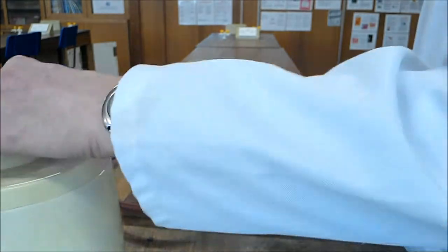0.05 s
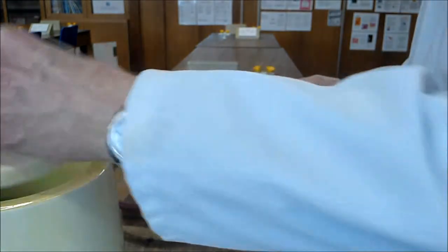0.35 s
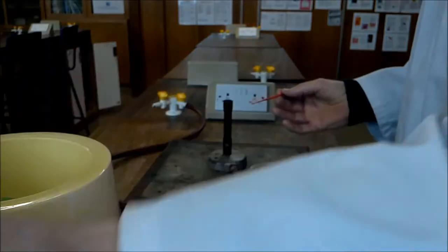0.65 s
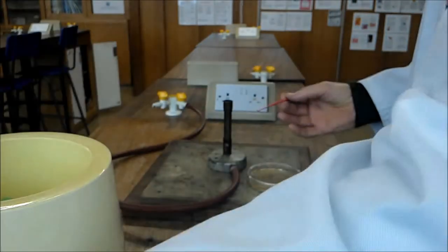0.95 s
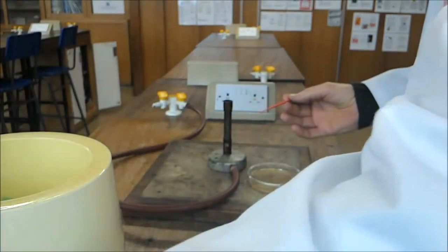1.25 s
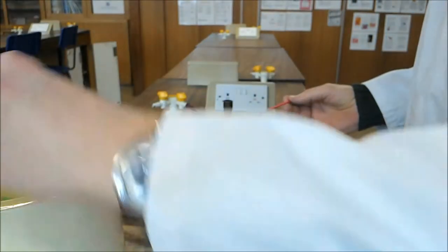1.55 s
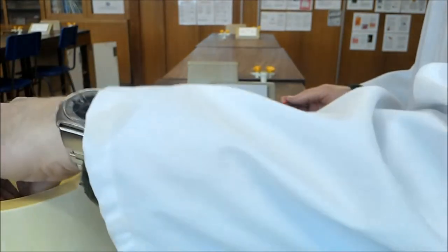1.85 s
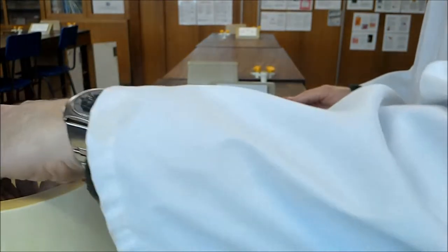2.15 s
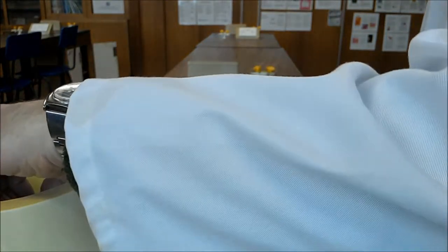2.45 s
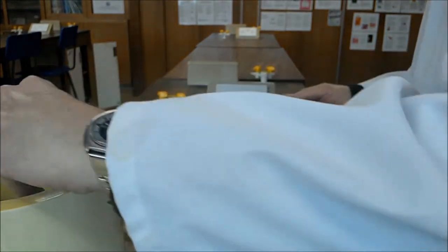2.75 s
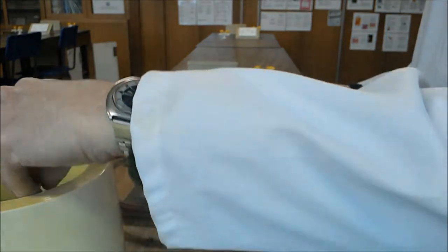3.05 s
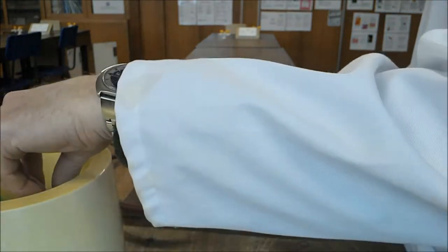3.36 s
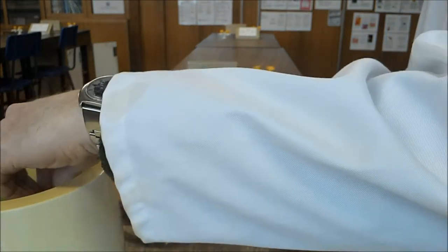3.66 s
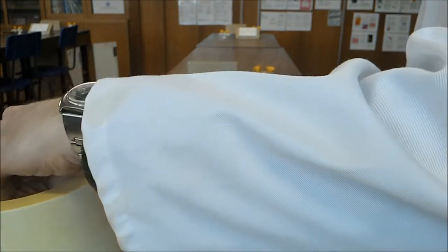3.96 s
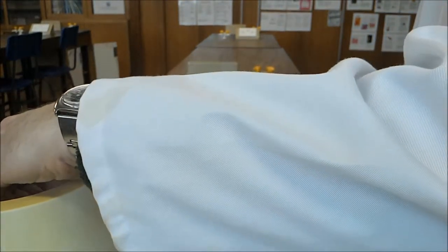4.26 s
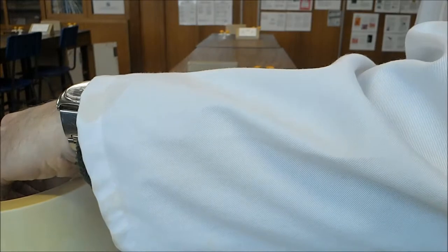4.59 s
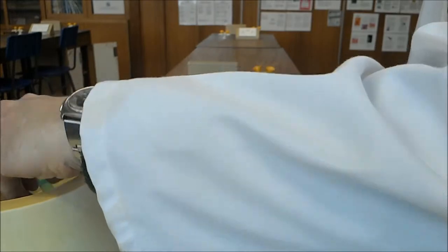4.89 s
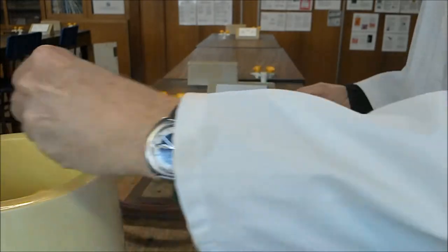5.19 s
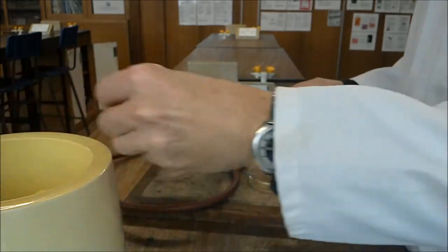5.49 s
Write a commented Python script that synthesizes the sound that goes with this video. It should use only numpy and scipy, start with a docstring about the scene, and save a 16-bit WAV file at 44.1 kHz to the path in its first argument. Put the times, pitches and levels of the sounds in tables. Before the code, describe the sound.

A gas burner hisses faintly while a sleeve rustles close by, with one sharp snap, a hard knock and scattered dry clicks.

```python
"""A gas burner hisses on a laboratory bench, its jet exciting the tube's resonances over a roaring flame.
Early bumps and knocks set the bench and room ringing; at 1.3 s a sharp snap makes the gain control duck
and slowly recover, and the hardest knock follows. An arm reaches across near the microphone and shades
the hiss: fingers rummage in a plastic pot, a cotton sleeve brushes, and creases give way in dry ticks.
From about 5 s the hiss comes out of the arm's shadow and the flame swells."""
import sys
import numpy as np
from scipy import signal
from scipy.fft import rfft, irfft
from scipy.io import wavfile
from scipy.ndimage import uniform_filter1d

SR = 44100
rng = np.random.default_rng(int(sys.argv[2]) if len(sys.argv) > 2 else 0)


def log_audio(samples):
    """Write samples as a 16-bit WAV file to the path given in sys.argv[1]."""
    # one column per channel
    frames = np.atleast_2d(samples).T
    # limit to full scale, then quantise
    limited = np.clip(frames, -1, 1)
    pcm = np.round(limited * 32767).astype(np.int16)
    wavfile.write(sys.argv[1], SR, pcm)


N = 252693
TIME = np.arange(N) / SR


def undb(db):
    """Amplitude ratio of a level in decibels."""
    return 10 ** (np.asarray(db) / 20)


def unit(x):
    """Normalisation to rms 1."""
    return x / np.sqrt(np.mean(x ** 2))


def add(track, s, sound):
    """Superposition: a sound joins the track at time s."""
    start = int(s * SR)
    track[start:start + len(sound)] += sound[:N - start]


def colour(x, points):
    """Spectral shaping by a curve of (frequency [Hz], gain [dB]) points."""
    hz, db = np.transpose(points)
    bins = np.fft.rfftfreq(len(x), 1 / SR)
    gain_db = np.interp(np.log(bins + 1), np.log(hz), db)
    return irfft(rfft(x) * undb(gain_db), len(x))


def band(x, hz, width):
    """Second-order resonance with gain 1 at its centre."""
    return signal.lfilter(*signal.iirpeak(min(hz, SR / 2 - 1), hz / width, fs=SR), x)


def wander(rate):
    """Smooth random modulation of rms 1."""
    hold = int(SR / rate)
    steps = np.repeat(rng.standard_normal(N // hold + 1), hold)
    return unit(uniform_filter1d(uniform_filter1d(steps, hold), hold)[:N])


def fade(t60, size):
    """Exponential decay by 60 dB in t60 seconds."""
    return np.exp(-np.log(1000) * TIME[:size] / t60)


def ring(modes, size):
    """Free vibration of damped modes (frequency [Hz], level [dB], t60 [s])."""
    return sum(undb(db) * np.sin(2 * np.pi * hz * TIME[:size]) * fade(t60, size) for hz, db, t60 in modes)


def crackle(spectrum, t60, grit_db, rise_s=0.00021, size=4096):
    """Tiny slips superpose in a decaying burst with the energy of 5 ms at rms 1."""
    slips = rng.standard_normal(size) * undb(grit_db * rng.standard_normal(size))
    onset = 1 - np.exp(-(TIME[:size] / rise_s) ** 2)
    burst = colour(slips, spectrum) * fade(t60, size) * onset
    return burst * np.sqrt(SR / 200 / np.sum(burst ** 2))


# rush of gas and air: (frequency [Hz], relative level [dB])
JET_SPECTRUM = [(200, 9), (600, -4), (1300, 2), (3000, 2.5), (4800, 4.5), (6300, 5.5), (7600, 0),
                (11000, -6), (15500, -15.5)]
# resonances of the burner tube: (frequency [Hz], bandwidth [Hz], lift [dB])
TUBE_RESONANCES = [(1987, 42, 19), (3900, 120, 12), (5700, 180, 7), (8500, 240, 7.5), (10150, 300, 3),
                   (11750, 300, 5), (14300, 400, 6)]
def jet_hiss(waver_db=1.5):
    """Forced resonance: broadband jet noise drives the tube, whose response wavers."""
    jet = colour(rng.standard_normal(N), JET_SPECTRUM)
    whistle = sum((undb(db) - 1) * band(jet, hz, width) for hz, width, db in TUBE_RESONANCES)
    return unit(jet + whistle * undb(waver_db * wander(9)))


# roar of the flame: (frequency [Hz], relative level [dB])
FLAME_SPECTRUM = [(20, -56), (60, -20), (125, -4), (220, -0.6), (330, -6), (480, -14), (800, -22.5),
                  (2000, -48)]
# course of the burner: (time [s], treble gain past the arm [dB], flame gain [dB])
BURNER_COURSE = [(0, -15, -6.5), (.62, -10, -3.5), (.85, -1, -1.2), (1.3, -1, 1), (1.851, -7.5, -1),
                 (2.8, -7.5, 1), (3.35, -9, -3.5), (4.6, -9, -.5), (5.0, -3.5, 1), (5.3, 0, 5.5),
                 (5.73, 3, 6)]
def burner(hiss_db=-52.5, roar_db=-51.5, flutter_db=1.6):
    """Combustion noise: the flame's low, fluttering roar lies under the shaded hiss of the jet."""
    times, *columns = np.transpose(BURNER_COURSE)
    shade_db, flame_db = (np.interp(TIME, times, column) for column in columns)
    hiss = arm_shadow(jet_hiss(), shade_db)
    roar = unit(colour(rng.standard_normal(N), FLAME_SPECTRUM))
    return hiss * undb(hiss_db) + roar * undb(roar_db + flame_db + flutter_db * wander(20))


def arm_shadow(x, db, low_share=0.47, middle_share=.7):
    """Diffraction: long waves bend round the arm, so only the top band takes the full level change."""
    low = colour(x, [(2200, 0), (3500, -10), (7000, -40)])
    top = colour(x, [(3500, -40), (7000, -8), (9000, 0)])
    middle = x - low - top
    return low * undb(low_share * db) + middle * undb(middle_share * db) + top * undb(db)


# hollow clatter of things on the bench: (frequency [Hz], relative level [dB])
CLATTER_SPECTRUM = [(60, -30), (150, 2), (300, 6.5), (520, -3), (820, -11.5), (1200, -9), (2500, -26),
                    (8000, -62)]
def thump(hz, clatter_db, cycles=5, clatter_t60=0.11):
    """Heavy damping: a struck mode dies in a few cycles, beside the clatter shaken loose."""
    clatter = crackle(CLATTER_SPECTRUM, clatter_t60, grit_db=1.0)
    return ring([(hz, 0, cycles / hz)], size=4096) + undb(clatter_db) * clatter


# soft bumps of hand and arm: (time [s], level [dB], pitch [Hz])
SOFT_BUMPS = [(.088, -32.5, 141), (.377, -36, 220), (3.021, -24.5, 129), (4.169, -28, 253),
              (4.193, -28, 144.8), (4.7662, -33.5, 550), (5.501, -19, 260), (5.5189, -22.5, 138)]
# hard knocks: (time [s], thump level [dB], thump pitch [Hz], click level [dB], click centre [Hz])
HARD_KNOCKS = [(0.1045, -20.5, 396, -34.5, 3600), (0.3554, -35.5, 220, -54.5, 1460),
               (0.6614, -36.5, 500, -44, 2830), (1.0844, -24.5, 300, -28, 4480),
               (1.477, -27.5, 400, -29, 4200), (1.4828, -6.5, 490, -6.5, 2756)]
def knocks(rattle_db=-12, lowest_hz=105):
    """Impact excitation: every blow thumps the bench; a hard contact adds a click and a fine rattle."""
    out = np.zeros(N)
    for s, db, hz in SOFT_BUMPS:
        add(out, s, undb(db) * thump(hz, clatter_db=-19))
    for s, db, hz, click_db, click_hz in HARD_KNOCKS:
        add(out, s, undb(db) * thump(hz, clatter_db=-9))
        spectrum = [(click_hz / 10, -3), (click_hz, 0), (click_hz * 2, -8), (click_hz * 4, -32)]
        add(out, s, undb(click_db) * crackle(spectrum, t60=0.017, grit_db=5.0))
        add(out, s, undb(click_db + rattle_db) * crackle(spectrum, t60=0.19, grit_db=1.5))
    # the deep bass of the blows is filtered out
    return signal.sosfilt(signal.butter(4, lowest_hz, "high", fs=SR, output="sos"), out)


# the bench top and what stands on it: (frequency [Hz], relative level [dB], t60 [s])
BENCH_MODES = [(242, -14, .2), (393, -9.5, 1.25), (525, 2.5, 0.17), (780, -11, 0.24), (840, 11, 0.13),
               (948, 9, 0.15), (1235, 1, .18), (2400, -11, .15)]
def bench(blows):
    """Modal response: each blow is convolved with the free vibration of the bench."""
    return signal.fftconvolve(blows, ring(BENCH_MODES, size=SR))[:N]


# reverberation of the laboratory: (octave centre [Hz], relative level [dB], t60 [s])
ROOM_BANDS = [(138, -15, 0.17), (265, -4, 0.66), (490, -1.5, 0.31), (890, -13.5, 0.39), (1976, -15.5, 0.18),
              (4000, -15.5, .28), (8250, -34.5, .2)]
def room(x, near_t60=0.032, near_db=3, gap_s=0.0023):
    """Reverberation: early reflections from bench and arm lie over the room's longer diffuse tail."""
    response = np.zeros(SR)
    for hz, db, t60 in ROOM_BANDS:
        octave = [(hz / 2, -30), (hz / np.sqrt(2), 0), (hz * np.sqrt(2), 0), (hz * 2, -30), (hz * 10, -70)]
        noise = colour(rng.standard_normal(SR), octave)
        band_share = np.sqrt(2) * hz / SR
        for decay, level_db in ((t60, db), (near_t60, db + near_db)):
            tail = noise * fade(decay, size=SR)
            response += undb(level_db) * tail * np.sqrt(band_share / np.sum(tail ** 2))
    delayed = np.r_[np.zeros(int(gap_s * SR)), response]
    return signal.fftconvolve(x, delayed)[:N]


# the snap's short ring: (frequency [Hz], level before softening [dB], t60 [s])
SNAP_MODES = [(2210, 19, 0.0033), (850, 0, 0.0032), (422, -8, .014), (4800, 0.5, 0.0029)]
def snap(at_s=1.3275, contact_hz=5500):
    """Impulse response: a hard snap by the microphone, its edge softened by the finite contact time."""
    out = np.zeros(N)
    add(out, at_s, -ring(SNAP_MODES, size=2048))
    return signal.lfilter(*signal.butter(2, contact_hz, fs=SR), out)


def tick(hz, neutral_hz=2710, ring_db=5, ring_q=5.4):
    """Buckling: a soft crease rings low with more body, a stiff one high with more edge."""
    octaves = np.log2(hz / neutral_hz)
    body_db = -10 * octaves
    edge_db = -23 + 9 * octaves
    spectrum = [(150, body_db - 18), (600, body_db - 8), (1200, body_db), (2200, body_db),
                (4300, 0), (6200, -3), (8500, edge_db), (15000, edge_db - 14)]
    burst = crackle(spectrum, t60=0.013, grit_db=4)
    return np.std(burst) * unit(burst + undb(ring_db) * band(burst, hz, hz / ring_q))


# sharpest ticks of creases and of fingers in the pot: (time [s], level [dB], ring frequency [Hz])
SHARP_TICKS = [(1.723, -44, 4520), (2.0226, -38.5, 4030), (2.473, -42.5, 4200), (2.5822, -33, 6000),
               (2.6691, -31, 6000), (2.9429, -31.5, 1160), (2.954, -28.5, 3530), (2.9985, -29.5, 1190),
               (3.0608, -17.5, 5030), (3.1807, -33.5, 4200), (3.214, -35, 3070), (3.2526, -35.5, 4340),
               (3.531, -37, 2350), (3.537, -40.5, 1200), (3.5734, -36.5, 5900), (3.6525, -39, 5900),
               (3.6756, -25, 3970), (3.722, -26, 5050), (3.7315, -18.5, 3220), (4.1739, -34, 3326),
               (4.2037, -26, 4630), (4.287, -39, 6300), (4.3315, -25.5, 5170), (4.4216, -29, 1900),
               (4.4787, -40.5, 3200), (4.4984, -39.5, 3000), (4.7661, -32.5, 5600), (4.8173, -31.5, 4530),
               (5.0668, -30.5, 5160), (5.069, -34.5, 1245), (5.1876, -35.5, 4100), (5.36, -41.5, 2600)]
def ticks(settle_s=.02, settle_db=-16.0, slips=2):
    """Relaxation: weaker slips follow each sharp tick as the crease settles."""
    out = np.zeros(N)
    for s, db, hz in SHARP_TICKS:
        add(out, s, undb(db) * tick(hz))
        for lateness in rng.random(slips):
            gain = undb(db + settle_db) * (1 - lateness / 2)
            add(out, s + settle_s * lateness, gain * tick(hz))
    return out


# cotton catching, and cotton sliding freely: (frequency [Hz], relative level [dB])
CATCH_SPECTRUM = [(200, 1.5), (700, 1.5), (1500, 1), (3000, 3.5), (4600, -2), (6300, 5), (8000, -2.5),
                  (12000, -14), (15500, -54)]
SWISH_SPECTRUM = [(800, -21), (3000, -22), (4600, 9), (6400, 11.5), (8000, -7), (11000, -5), (14000, -11),
                  (15500, -19)]
# strokes: (centre time [s], duration [s], catching level [dB], swish level [dB], crease ring [Hz])
SLEEVE_STROKES = [(2.024, .04, -47, -63, 3360), (2.585, 0.041, -47.5, -54, 5700),
                  (2.696, .08, -49, -57.5, 5660), (2.961, 0.2, -54, -61.5, 3430),
                  (3.219, .18, -51.5, -67, 3600), (3.538, .14, -48, -64, 5400),
                  (3.677, .09, -43.5, -59, 2720), (3.849, .16, -59, -71, 3970),
                  (4.185, .09, -50, -70, 3600), (4.4, 0.23, -53, -68, 2900),
                  (4.765, 0.021, -45.5, -51, 5000), (4.861, 0.11, -50.5, -48, 5143),
                  (5.081, 0.048, -53.5, -54, 3000), (5.25, .35, -62.5, -60, 2600)]
def sleeve(catch_db=6, catch_rate=260, fibre_db=5, threads_db=-2, rumble_db=-5, rumble_hz=150):
    """Stick-slip friction: threads catch and let go over a dull rumble, or slide with a smooth swish."""
    catching, sliding = np.zeros(N), np.zeros(N)
    for s, length, rough_db, swish_db, _ in SLEEVE_STROKES:
        speed = np.exp(-(2 * (TIME - s) / length) ** 2)
        catching += undb(rough_db) * speed
        sliding += undb(swish_db) * speed
    fibres = rng.standard_normal(N) * undb(fibre_db * rng.standard_normal(N))
    grip = undb(catch_db * np.minimum(wander(catch_rate), 2))
    catches = undb(threads_db) * unit(colour(fibres, CATCH_SPECTRUM) * grip)
    low_noise = band(rng.standard_normal(N), rumble_hz, rumble_hz)
    rumble = undb(rumble_db) * unit(band(low_noise, rumble_hz, rumble_hz))
    swish = unit(colour(rng.standard_normal(N), SWISH_SPECTRUM))
    return catching * (catches + rumble) + sliding * swish


def creases(per_s=62, lift_db=8, scatter_db=3, scatter_octaves=0.59, reach=1.3):
    """Random buckling: small creases tick through each stroke, louder where the cloth catches harder."""
    out = np.zeros(N)
    for s, length, rough_db, _, hz in SLEEVE_STROKES:
        count = int(np.ceil(per_s * length))
        for k, (place, strength, stiffness) in enumerate(rng.uniform(-1, 1, (count, 3))):
            offset = reach * ((k + .5 + place / 2) / count - .5)  # stroke lengths from the centre
            gain = undb(rough_db + lift_db + scatter_db * strength) * np.exp(-2 * offset ** 2)
            add(out, s + offset * length, gain * tick(hz * 2 ** (scatter_octaves * stiffness)))
    return out


def scene(knock_bench_db=-58, snap_bench_db=-52, knock_room_db=-1, snap_room_db=-3, cloth_room_db=-5):
    """Superposition: the direct sounds add to the ringing of the bench and the room's reflections."""
    blows, crack, gas = knocks(), snap(), burner()
    ringing = bench(undb(knock_bench_db) * blows + undb(snap_bench_db) * crack)
    echo = undb(knock_room_db) * room(blows) + undb(snap_room_db) * room(crack)
    handling = sleeve() + ticks() + creases()
    echo += undb(cloth_room_db) * room(handling)
    return (gas + blows + crack + ringing + handling + echo)[None]


def record(dry, threshold_db=-18, release_s=1.204, attack_s=0.00053, ceiling=.95, top_hz=15400):
    """Automatic gain control ducks fast and recovers slowly; peaks saturate softly and the top is cut."""
    power = signal.lfilter(np.ones(220) / 220, 1, dry[0] ** 2)  # 5 ms mean
    over_db = np.maximum(10 * np.log10(power + 1e-12) - threshold_db, 0)
    recovery = np.exp(-TIME / release_s)
    cut_db = np.maximum.accumulate(over_db / recovery) * recovery
    lag = np.exp(-1 / (attack_s * SR))
    ducked = dry * undb(-signal.lfilter([1 - lag], [1, -lag], cut_db))
    rounded = ducked / np.sqrt(1 + (ducked / ceiling) ** 2)
    return signal.sosfilt(signal.ellip(8, .2, 70, top_hz, fs=SR, output="sos"), rounded)


dry = scene()
out = record(dry)
log_audio(out)
```